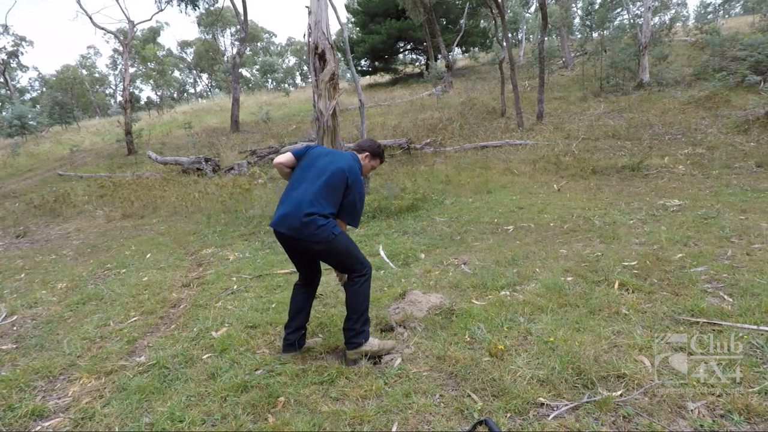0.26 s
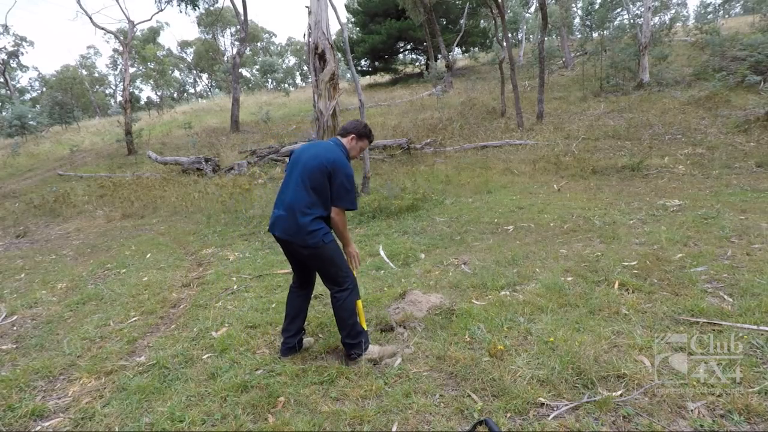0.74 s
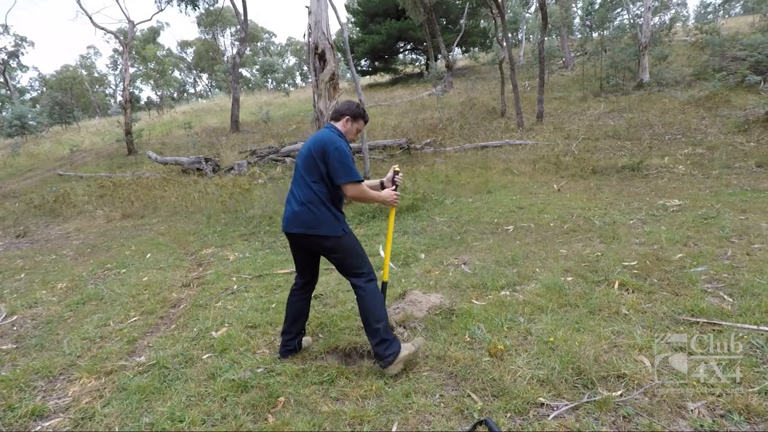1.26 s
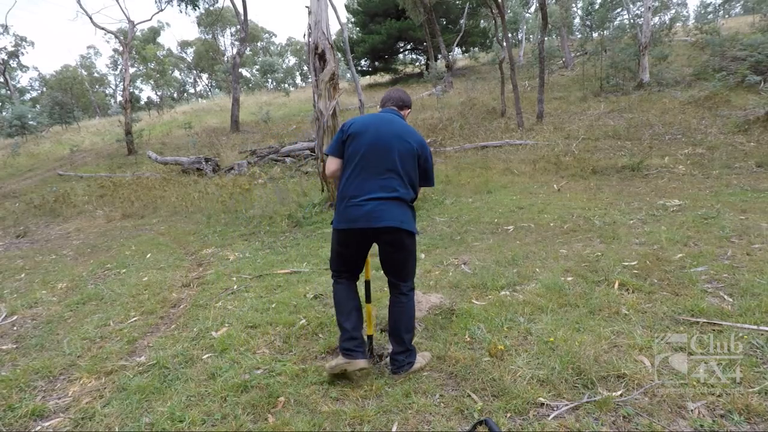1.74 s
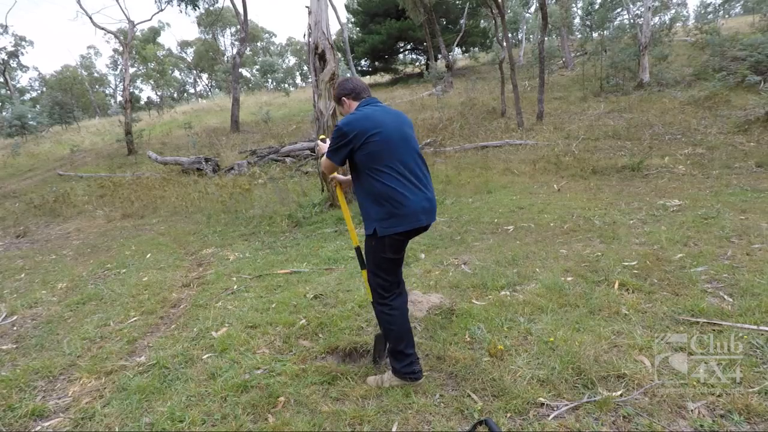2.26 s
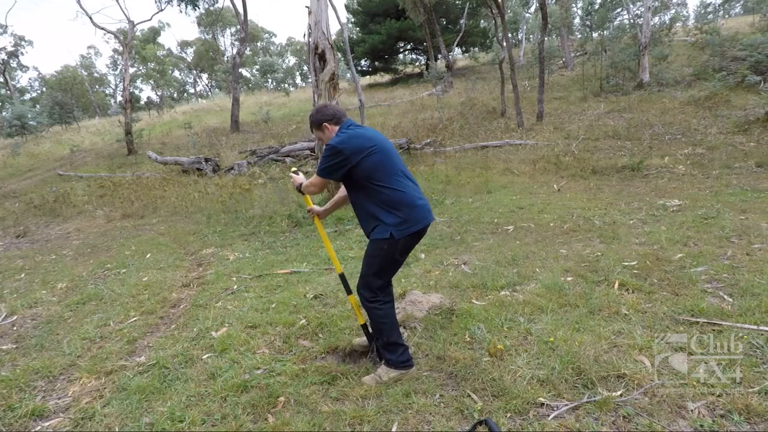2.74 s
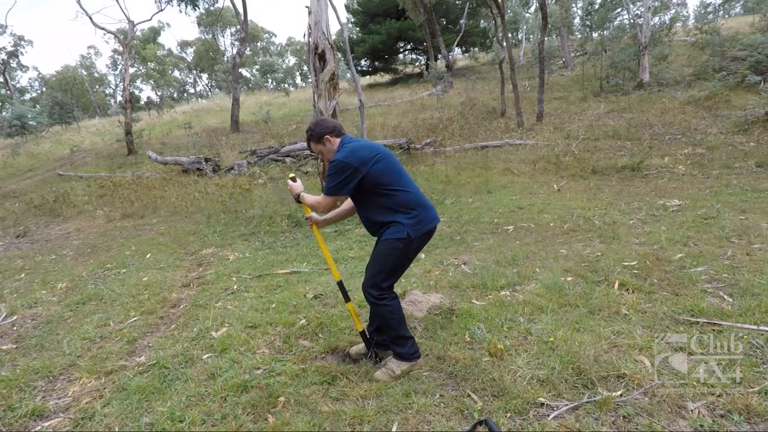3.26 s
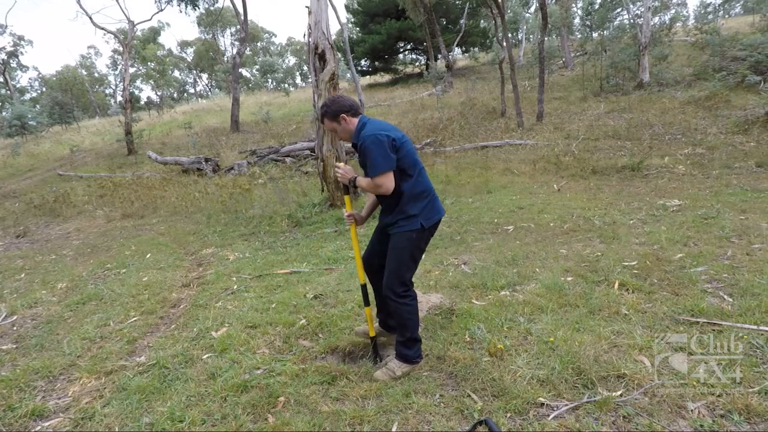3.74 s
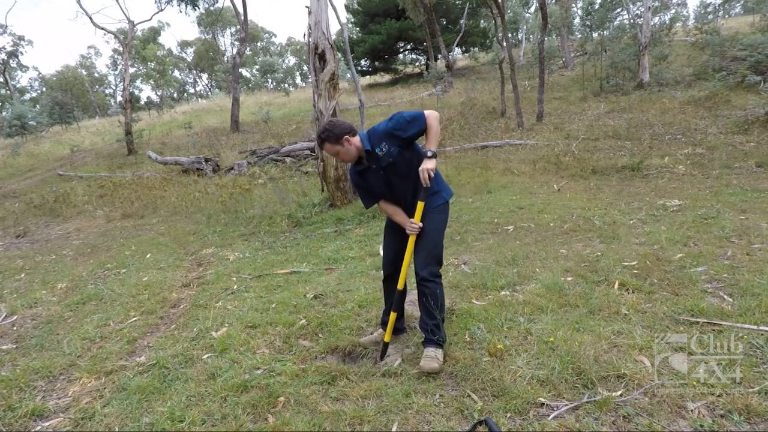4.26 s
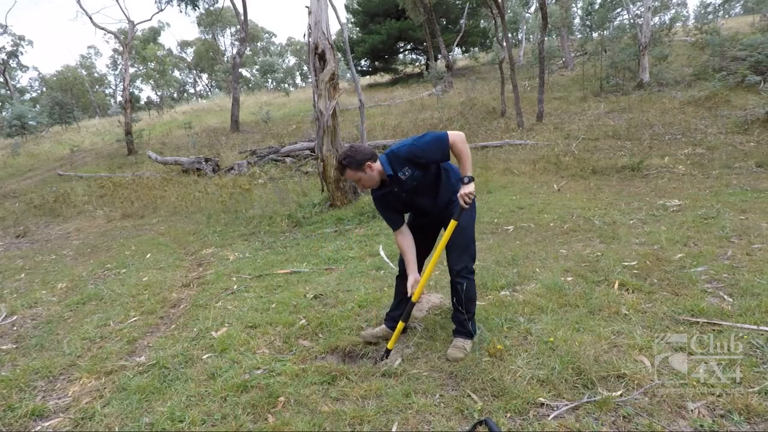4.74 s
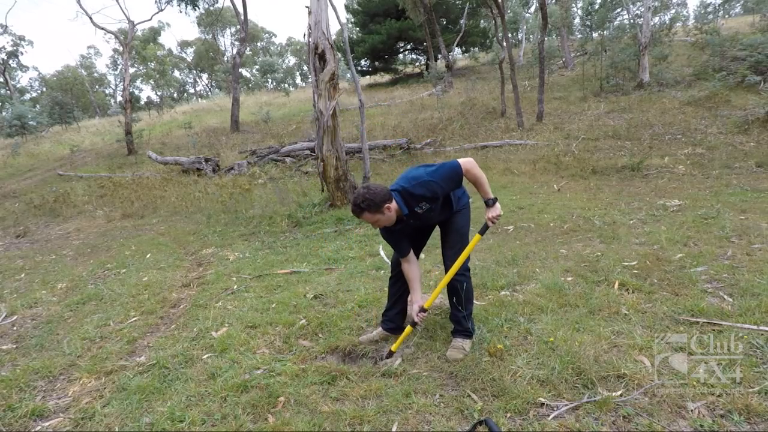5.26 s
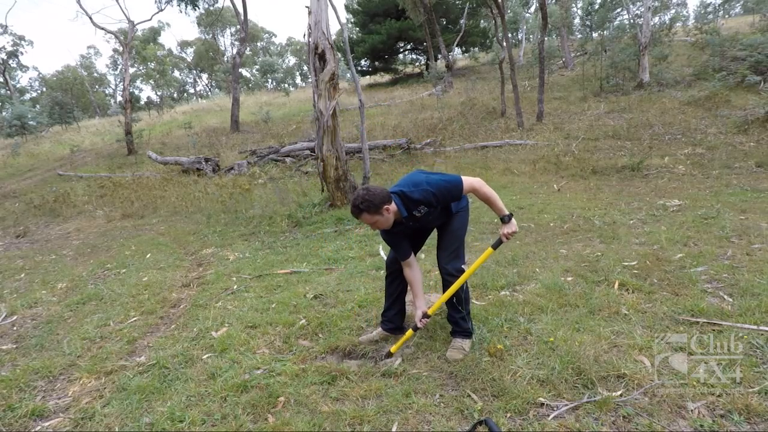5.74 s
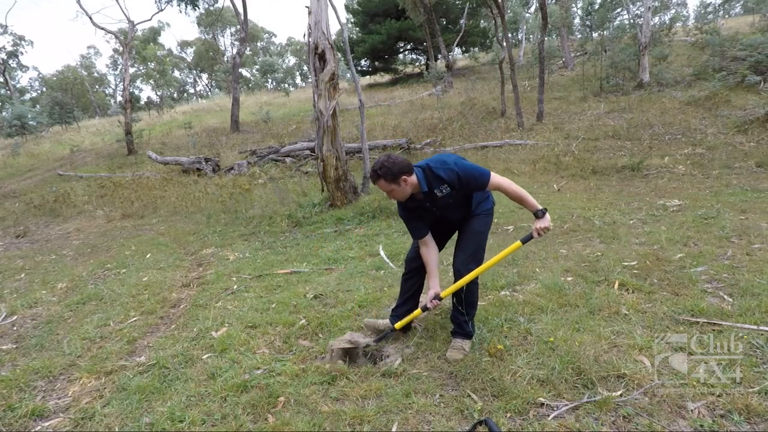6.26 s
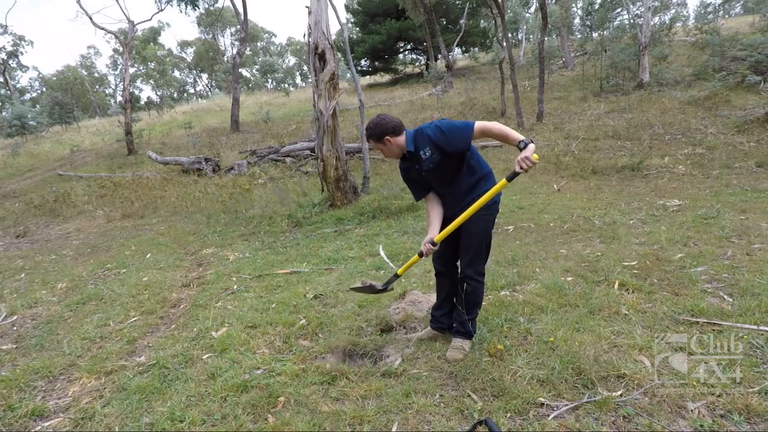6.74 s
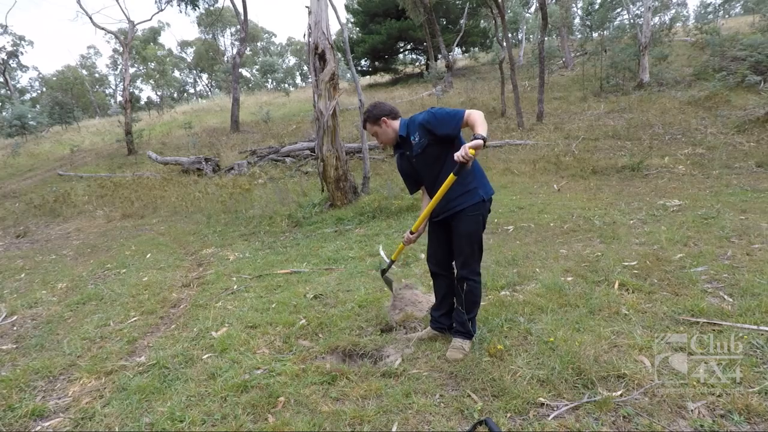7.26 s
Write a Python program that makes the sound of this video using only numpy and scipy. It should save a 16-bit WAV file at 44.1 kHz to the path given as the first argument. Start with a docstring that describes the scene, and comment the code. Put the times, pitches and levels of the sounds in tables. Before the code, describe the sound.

Gritty crunches and rustling dry grass come in short strokes, with dull knocks on packed earth and sharp pebble ticks. After a short metallic clink comes a cluster of hard stamps, then muffled deep soil movement and low thumps before it quietens. Behind lie a wavering low aircraft hum, soft air and a little wind rumble, with chirping bird trills clearer late on. Outdoors, stereo, at a few metres' distance.

```python
"""A spade digs dry grassy soil on an open hillside, heard a few metres away by two microphone ports.
A propeller aircraft drones throughout, a synthesized tone with sinking pitch over filtered-noise air.
Stamps crunch clods, hiss grit and rustle grass (shaped noise), with thuds and ticks; a small bird trills.
At 2.1 s a stone rings the steel blade's modes; heavy stamps follow, then deep levering from 3.4 s.
Thumps and more trills of falling chirps come after 5 s; the last strokes are light."""
import sys
import numpy as np
from scipy import signal
from scipy.fft import rfft, irfft
from scipy.io import wavfile
from scipy.ndimage import uniform_filter1d

SR = 44100
rng = np.random.default_rng(int(sys.argv[2]) if len(sys.argv) > 2 else 0)


def unload_wav(signal):
    """Save mono or channel-first audio to the path in sys.argv[1] as 16-bit WAV at rate SR, clipped to [-1, 1]."""
    wavfile.write(
        sys.argv[1],
        SR,
        np.round(np.clip(np.atleast_2d(signal).T, -1, 1) * 32767).astype(np.int16),
    )


N = 331191  # samples, about 7.5 s


def gain_of(db):
    """Turns decibels into a plain multiplier."""
    return 10 ** (np.asarray(db) / 20)


def evened(x):
    """Scales a sound to an rms (average strength) of 1."""
    return x / np.sqrt(np.mean(x ** 2) + 1e-20)


def read(points, hz):
    """Reads a curve at the given frequencies, with straight lines on a log frequency scale."""
    f, value = np.transpose(points)
    return np.interp(np.log(hz + 1), np.log(f + 1), value)


def along(points, column=1):
    """One column of a time curve at every sample."""
    rows = np.transpose(points)
    return np.interp(np.arange(N) / SR, rows[0], rows[column])


def coloured(x, points):
    """Shapes a sound by a spectrum curve, rms 1."""
    curve_db = read(points, np.fft.rfftfreq(N, 1 / SR))
    return evened(irfft(rfft(x) * gain_of(curve_db), N))


def slow(hz):
    """Random drift with changes up to about hz, rms 1."""
    f = np.fft.rfftfreq(N, 1 / SR)
    spectrum = rfft(rng.standard_normal(N)) / (1 + (f / hz) ** 4)
    return evened(irfft(spectrum, N))


def add(mix, s, sound):
    """Adds a sound into the mix from second s, cutting off whatever sticks out at either end."""
    at = round(s * SR)
    part = mix[max(at, 0):][:len(sound) + min(at, 0)]
    sound = sound[max(-at, 0):]
    part += sound[:len(part)]  # part is a view, so this changes the mix


def grains(per_s, spread_db, smooth):
    """Sparse clicks of uneven size and sign over a share of smooth noise."""
    size = gain_of(spread_db * np.minimum(rng.exponential(1, N), 4))
    clicks = size * (rng.random(N) < per_s / SR) * rng.choice([-1., 1.], N)
    return evened(clicks) + smooth * rng.standard_normal(N)


def patchy(x, depth_db):
    """Narrow bands swell and fade as the soil's grip on the steel shifts."""
    z = signal.stft(x, nperseg=512)[2]
    patches = uniform_filter1d(rng.standard_normal(z.shape), size=3, axis=0)  # blurred over pitch
    patches = evened(uniform_filter1d(patches, size=8, axis=1))  # blurred over time
    return evened(signal.istft(z * gain_of(depth_db * patches), nperseg=512)[1][:N])


def ring(drive, damping):
    """The steel blade's modes set off by a drive; soil holding the blade shortens them (damping below 1)."""
    # the blade's own tones: (pitch [Hz], level [dB], time to fall 60 dB when free [s])
    modes = [(2093, -1.5, .9), (1600, -8, .1), (2198, -8, .25), (2466, -9, .16), (2689, -1, .25),
             (2826, -2, .2), (3500, -6, .1), (6437, -8, 1.1), (6790, -6, .3), (7435, -8, .3)]
    t = np.arange(SR // 2) / SR
    tones = np.zeros(len(t))
    for hz, db, t60 in modes:
        tones += gain_of(db - 60 * t / (t60 * damping)) * np.sin(2 * np.pi * hz * t)
    return signal.oaconvolve(drive, tones / np.linalg.norm(tones))[:N]


def ports(x, same, strength=1):
    """Spreads a sound over two ports; part of it arrives by other paths and differs left to right."""
    # how much louder the left port is: (frequency [Hz], left minus right [dB])
    port_db = [(100, -.6), (400, -3), (750, -8), (1300, -4), (2000, -.5), (4200, 0), (5000, 7.5), (5900, 0),
               (6700, -19), (8000, -11), (9500, -1)]
    # how far the left port is ahead: (frequency [Hz], phase lead [radians])
    port_lead = [(500, 0), (700, .5), (900, 1.5), (1400, 2.1), (2500, 0), (4500, 0), (5200, -1.4),
                 (6100, -2.4), (7100, 0), (8000, .4)]
    hz, _, z = signal.stft(x, SR, nperseg=512)
    c = np.clip(read(same, hz), 0, 1)[:, None]
    # scrambled frames partly cancel, hence the lift
    other = 1.31 * z * np.exp(2j * np.pi * rng.random(z.shape))
    ratio = gain_of(strength * read(port_db, hz)) * np.exp(1j * read(port_lead, hz))
    ratio = ratio[:, None]
    left = ratio * (c * z + np.sqrt(1 - c ** 2) * other)
    pair = np.array([left, z])
    pair *= 2 / np.sqrt(1 + abs(ratio) ** 2 + 2 * c * ratio.real)  # the mean of both keeps the spectrum
    return signal.istft(pair, SR, nperseg=512)[1][:, :N]


def wind():
    """Wind presses on the ports as lumpy low rumble, mostly shared by both."""
    # strength of the wind: (time [s], level [dB])
    gusts = [(0, -90.5), (.8, -67), (1.5, -62), (2.2, -75), (7.51, -86)]
    rumble, apart = slow(45), .14 * slow(45)
    return gain_of(along(gusts) + 2.0 * slow(6)) * np.array([rumble + apart, rumble - apart])


def air():
    """The aircraft's dull roar, breeze and hiss: one shaped noise, swelling a little."""
    # spectrum of the open air: (frequency [Hz], relative level [dB per Hz])
    air_colour = [(20, -49.5), (96, -55), (120, -22), (158, -3), (239, -18.5), (577, -24.5), (1430, -41),
                  (3860, -49), (6520, -49), (9860, -51.5), (14500, -64.5)]
    level_db = -48.5 + 0.19 * slow(0.99)
    return gain_of(level_db) * coloured(rng.standard_normal(N), air_colour)


def aircraft():
    """A propeller tone that sinks as the aircraft leaves; turbulent air makes it flutter and blur."""
    # propeller tone: (time [s], pitch [Hz])
    drone_pitch = [(0, 168), (4, 159.4), (7.51, 156)]
    # propeller tone, fading in and out through moving air: (time [s], level [dB])
    drone_level = [(0, -49), (0.2, -40), (0.62, -23), (0.78, -28), (1.12, -43), (2.2, -41.5), (2.9, -57.5),
                   (3.07, -37.5), (3.78, -39), (3.87, -47.5), (4.35, -49), (4.47, -40), (5.15, -32),
                   (5.4, -33), (6.03, -40.5), (6.3, -34.5), (6.8, -41), (7.5, -43)]
    # parts of the tone: (multiple of its pitch, relative level [dB])
    drone_orders = [(1, 0), (1.5, -27)]
    # engine beat at half the propeller tone: (time [s], level [dB])
    engine_level = [(0, -72.5), (.7, -63), (1.6, -66), (2.4, -75), (3.5, -75), (5.2, -70.5), (7.51, -81)]
    turns = np.cumsum(along(drone_pitch)) / SR
    scatter = 1 + .12 * (slow(16) + 1j * slow(16))
    tone = np.zeros(N)
    for multiple, db in drone_orders:
        tone += gain_of(db) * (scatter * np.exp(2j * np.pi * multiple * turns)).real
    beat_scatter = 1 + 0.5 * (slow(8) + 1j * slow(8))
    beat = (beat_scatter * np.exp(1j * np.pi * turns)).real
    return gain_of(along(drone_level)) * evened(tone) + gain_of(along(engine_level)) * evened(beat)


def twitter():
    """A faint far twitter that grows: a wandering tone blurred into a narrow fluttering band."""
    middle_hz, level_db = 3300, -79
    pitch = middle_hz * (1 + .025 * slow(8))
    tone = np.sin(2 * np.pi * np.cumsum(pitch) / SR)
    flutter = (1 + slow(90)) * evened(gain_of(2.2 * slow(25)))
    growth = np.clip(np.arange(N) / SR / 7.6, 0, 1)
    return gain_of(level_db) * flutter * tone * growth


def birds():
    """A bird's trills of near-sine chirps, each falling in pitch, with the far twitter behind them."""
    # trills: (first chirp [s], gap [s], number of chirps, peak [dB], base pitch of the first chirp [Hz])
    trills = [(.527, .061, 5, -71, 8150), (3.071, .068, 3, -68, 7950), (5.265, .06, 1, -67, 7620),
              (5.522, .0535, 7, -63, 8500), (6.181, .073, 6, -68, 8300)]
    chirp_s = .027
    chirp_fall, trill_sag = .12, .016  # shares of the pitch: lost within a chirp, and from chirp to chirp
    out, u = np.zeros(N), np.linspace(0, 1, round(chirp_s * SR))
    bend = 1 + chirp_fall * (.4 - .5 * u - .5 * u ** 3)
    for first, gap, chirps, db, hz in trills:
        for k in range(chirps):
            pitch = hz * (1 - trill_sag * k) * bend
            chirp = np.sin(np.pi * u) * np.sin(2 * np.pi * np.cumsum(pitch) / SR)
            start = first + (k + 0.087 * rng.standard_normal()) * gap  # slightly uneven timing
            add(out, start, gain_of(db) * chirp)
    return out + twitter()


def ticks():
    """Pebbles and twigs crack: very short bursts of noise that die at once."""
    # pebbles and twigs ticking: (time [s], peak level [dB])
    tick_list = [(0.9986, -43), (1.2245, -46), (1.7924, -44.5), (1.844, -47), (2.649, -43), (2.724, -37),
                 (2.795, -31), (3.038, -46.5), (3.4555, -55), (3.493, -39), (4.0424, -42)]
    low_hz, high_hz, decay_s = 1300, 8000, .001
    out, t = np.zeros(N), np.arange(400) / SR
    band = signal.butter(3, [low_hz, high_hz], "bandpass", fs=SR, output="sos")
    for s, db in tick_list:
        burst = rng.standard_normal(400) * np.exp(-t / decay_s)
        crack = signal.sosfilt(band, burst)
        add(out, s, gain_of(db) * crack / abs(crack).max())
    return out


def knocks():
    """Earth hardly rings: it yields for a cycle, then dies in a few more."""
    # dull knocks of blade, boot and falling clods on packed earth: (time [s], level [dB], pitch [Hz])
    knock_list = [(0.138, -7, 470), (0.336, -28, 560), (0.373, -13, 620), (0.391, -11, 565),
                  (0.414, -13, 274), (1.052, -19, 456), (1.108, -32, 320), (1.223, -21, 690),
                  (1.225, -16.5, 334), (1.841, -19, 552), (1.859, -24, 580), (2.057, -12, 547),
                  (2.612, -7, 400), (2.795, 1, 610), (2.841, -0.5, 590), (2.856, 1, 596), (3.478, -30, 303),
                  (4.047, -22, 540), (4.591, -9, 358), (4.635, -18, 313), (5.079, -16.5, 231),
                  (5.17, -19, 260), (5.42, -21, 636), (5.44, 2, 241), (5.456, -7, 206), (5.638, -13.5, 215),
                  (5.872, -25, 680), (5.888, -7, 200), (5.924, -13, 213), (6.467, -28, 610),
                  (6.534, -30, 633), (6.563, -30.5, 595), (6.673, -27, 480)]
    out, t = np.zeros(N), np.arange(SR // 8) / SR
    for s, db, hz in knock_list:
        turns = hz * t
        onset = 1 - np.exp(-(turns / 1.26) ** 2)
        fade = gain_of(db + 4.0 - 8.0 * turns)  # loses 8 dB each cycle
        add(out, s - 0.34 / hz, onset * fade * np.sin(2 * np.pi * turns))  # starts a third of a cycle early
    return out


def clank():
    """A stone clips the lifted blade, which rings until it touches soil again."""
    struck_s, struck_db, grounded_s = 2.096, -15, 2.27
    blow = np.zeros(N)
    add(blow, struck_s, gain_of([struck_db]))
    free = np.clip((grounded_s - np.arange(N) / SR) / .03, 0, 1)
    return ring(blow, 1) * free


def swell(u, peak, start_db, end_db):
    """Gain that climbs to 1 at the peak and sinks after it; u runs 0-1 through the stroke."""
    return gain_of(np.interp(u, [0, np.clip(peak, .02, .98), 1], [start_db, 0, end_db]))


def efforts():
    """Push of blade and boot over time: gains of shallow crunch, deep crunch, grit and grass."""
    # strokes of blade and boot: (start [s], length [s], clod crunch [dB], grit hiss [dB],
    # dry grass rustle [dB], where the crunch peaks [0-1], where the hiss peaks [0-1],
    # share of the blade buried at the start and at the end [0-1, clipped])
    stroke_list = [(-.03, 0.24, -28, -40, -44.5, 0.53, .75, -0.14, 0.024),
                   (0.338, .15, -16, -38, -36.5, 0.27, .4, 0.023, 0.95),
                   (0.988, 0.26, -35.5, -62.5, -76, 0.51, 0.017, -0.0068, 0.19),
                   (1.983, 0.13, -39, -44.5, -44, 0.6, .35, 0.18, .03),
                   (2.082, 0.065, -34, -39.5, -43, 0.32, 0.18, 0.72, 0.033),
                   (2.303, 0.071, -48, -56, -49.5, 1, 1, .03, .03),
                   (2.607, 0.16, -28, -40, -36.5, 0.56, 0.33, .03, .03),
                   (2.686, 0.15, -21.5, -37, -36, 0.65, 0.31, 0.044, .03),
                   (2.778, 0.17, -16, -38, -36.5, 0.34, 0.064, .03, 0.028),
                   (3.435, 0.1, -36, -59, -64, 0.48, 0.18, 0, .3),
                   (3.5, 0.16, -39.5, -65, -65, 0.4, 0.38, 1, 0.74),
                   (3.84, 0.081, -65, -74, -71, .5, .45, .6, .6),
                   (4.038, 0.23, -43, -71.5, -71, 0.99, 0.26, 0.87, 0.99),
                   (4.585, 0.18, -35, -67.5, -56, 0.25, 0.82, 0.76, 0.92),
                   (4.951, .24, -41.5, -69.5, -69, 1, 0.1, 0.95, .9),
                   (5.406, 0.071, -26, -54.5, -56.5, 0.43, 0.17, 0.73, .99),
                   (5.61, 0.08, -39.5, -69, -69, 0.25, 0.44, .95, 1),
                   (5.855, 0.1, -24, -52.5, -71, 0.55, 0.33, 1, 1),
                   (6.552, 0.17, -47, -78, -70, 0.28, 0.31, 0, .03),
                   (7.11, 0.29, -54.5, -74, -73, 0.07, .2, 0.41, .03)]
    # small shifts of the feet, fading once the digger stands still: (time [s], crunch level [dB])
    shuffle = [(0, -51), (2.3, -51.5), (3.3, -50.5), (5.6, -52.5), (7.51, -60.5)]
    shuffle_grit_db, shuffle_grass_db = -26.5, -24  # against the shuffle's crunch
    bite_s, let_go_s = 0.019, 0.016  # contact is made and broken quickly; letting go takes twice let_go_s
    settle_db, settle_s = -8.5, .022  # loosened crumbs trickle back after each stroke

    shares_db = np.array([[-3], [-3], [shuffle_grit_db], [shuffle_grass_db]])
    gains = gain_of(along(shuffle) + shares_db)
    for s, length, clod_db, grit_db, grass_db, crunch_at, hiss_at, first, last in stroke_list:
        t = np.arange(0, length + 8 * settle_s, 1 / SR)
        u = np.minimum(t / length, 1)
        held = np.clip((length + let_go_s - t) / (2 * let_go_s), 0, 1) ** 2
        settling = gain_of(settle_db) * np.exp(-np.maximum(t - length, 0) / settle_s)
        touch = np.minimum(t / bite_s, 1) ** 2 * np.maximum(held, settling)
        crunch = touch * swell(u, crunch_at, start_db=-11.5, end_db=-15)
        hiss = touch * swell(u, hiss_at, start_db=-12.5, end_db=-19)
        deep = np.clip(first + (last - first) * u ** 2, 0, 1)
        parts = np.sqrt(1 - deep) * crunch, np.sqrt(deep) * crunch, hiss, hiss
        for gain, part, db in zip(gains, parts, (clod_db, clod_db, grit_db, grass_db)):
            add(gain, s, gain_of(db) * part)
    return gains


def strokes():
    """Crumbling clods below, grit and dry grass above, lumpy as the blade sticks and slips."""
    # blade biting the turf: (frequency [Hz], relative level [dB per Hz])
    turf_colour = [(100, -39.5), (140, -2.5), (215, -7.5), (480, 0), (650, -1.5), (730, -10.5),
                   (1040, -37.5), (1500, -39), (2200, -79.5)]
    # blade buried, levering: (frequency [Hz], relative level [dB per Hz])
    deep_colour = [(110, -27), (200, 2.5), (320, -2), (470, -25), (680, -22), (1050, -29), (1400, -50.5),
                   (2200, -62.5)]
    # grit along the steel: (frequency [Hz], relative level [dB per Hz])
    grit_colour = [(800, -26.5), (1100, -20), (1900, -9), (2860, -8.5), (3400, 2.5), (4000, -2.5),
                   (5400, 0.5), (6100, -6), (8000, -39.5)]
    # dry grass rustling: (frequency [Hz], relative level [dB per Hz])
    grass_colour = [(4500, -42.5), (5900, -13.5), (6600, 2), (7550, -2), (9000, -21), (10400, -31.5),
                    (14500, -47.5)]
    slips = slow(86)
    lumps = evened(gain_of(1.67 * slips))
    crumbs = patchy(grains(600, 1.37, 1.11), depth_db=3.0)
    turf = coloured(crumbs, turf_colour) * lumps
    deep = coloured(crumbs, deep_colour) * lumps
    grit = patchy(grains(4000, 3, 1.0), depth_db=3)
    grit = grit * evened(gain_of(0.3 * slips + 2.4 * slow(17)))
    held_ring = ring(grit, .12)  # the grit also rings the held blade
    grass = evened(coloured(grit, grass_colour) + .35 * coloured(held_ring, grass_colour))
    steel = evened(coloured(grit, grit_colour) + .25 * held_ring)
    return (efforts() * np.array([turf, deep, steel, grass])).sum(axis=0)


def scene():
    """Adds the digging and the bird to the air, the aircraft and the wind, as left and right."""
    # how alike digging and bird are at the two ports: (frequency [Hz], likeness [0-1])
    near_same = [(150, .93), (500, .98), (900, .85), (1700, .65), (2600, .99), (3000, .8), (3800, .99),
                 (7000, .88), (10500, .2)]
    # how alike the open air is at the two ports: (frequency [Hz], likeness [0-1])
    air_same = [(180, .999), (300, .8), (600, .75), (800, .4), (1200, .55), (2400, .05), (4000, .7),
                (6000, .25), (9000, .0)]
    near = ports(strokes() + knocks() + ticks() + clank() + birds(), near_same)
    # low cut of the microphone on all the near sounds: digging, knocks, ticks, ring and birds
    low_cut = signal.butter(6, 151.4, "highpass", fs=SR, output="sos")
    near = signal.sosfilt(low_cut, near)
    plane = aircraft() * gain_of([[-.4], [.4]])  # a little louder on the right
    return near + ports(air(), air_same, strength=0.22) + plane + wind()


def record(dry):
    """Band limit: a steep filter removes what lies above the edge."""
    edge_hz = 14600
    lowpass = signal.firwin(511, edge_hz, window=("kaiser", 9), fs=SR)
    return signal.oaconvolve(dry, lowpass[None], "same")


dry = scene()
out = record(dry)
unload_wav(out)
```